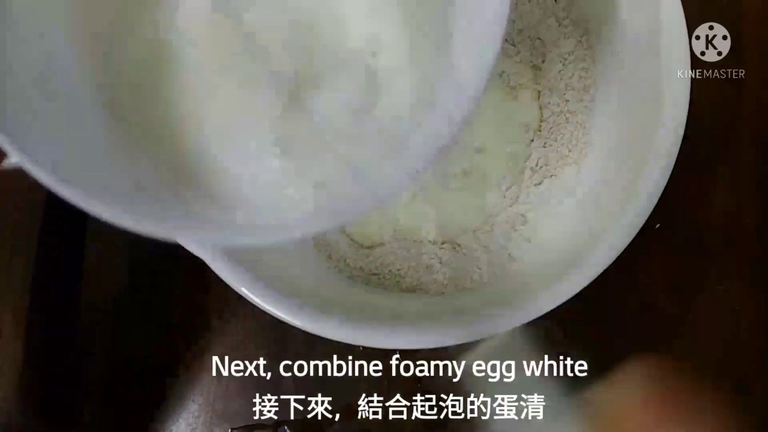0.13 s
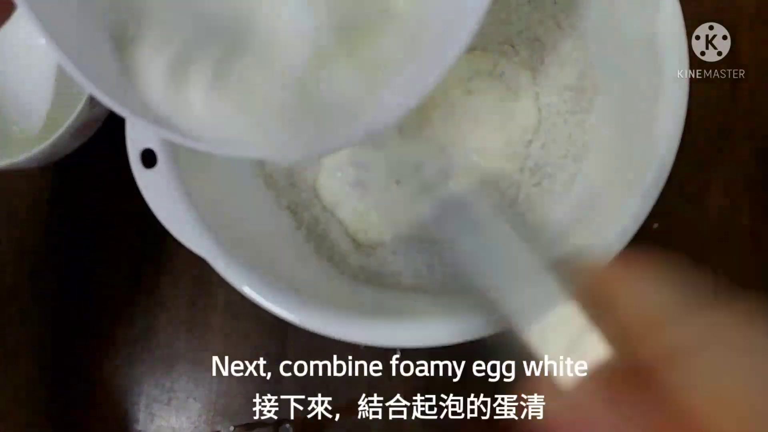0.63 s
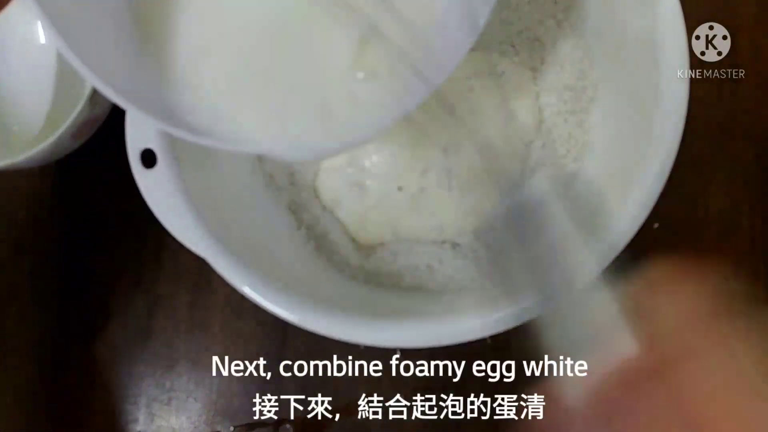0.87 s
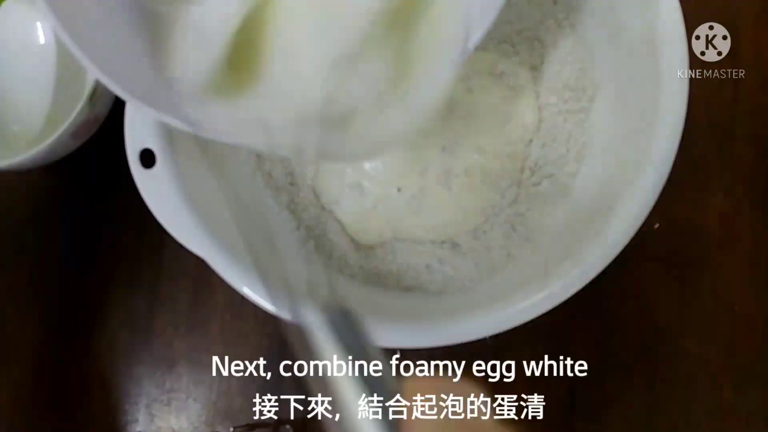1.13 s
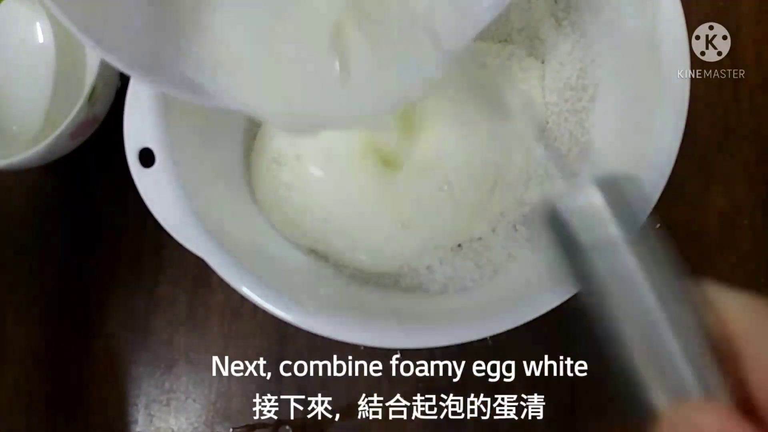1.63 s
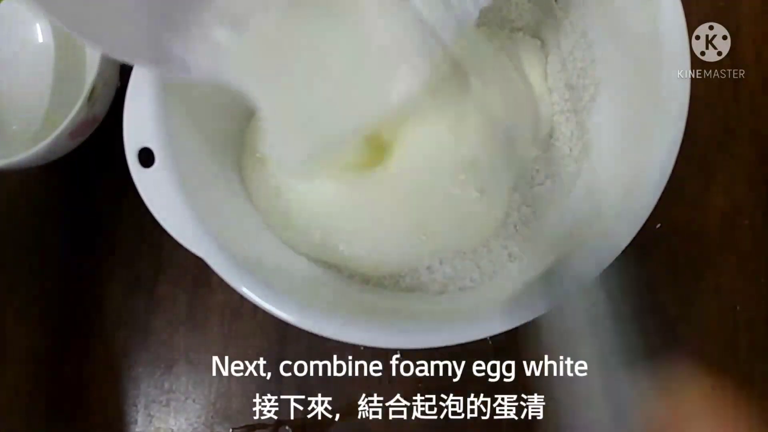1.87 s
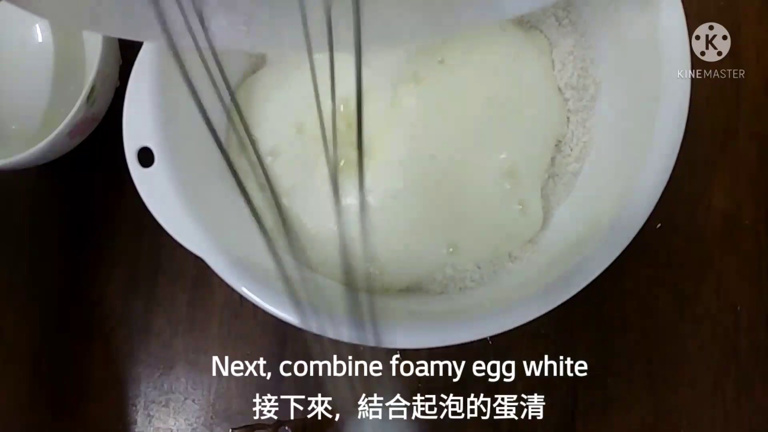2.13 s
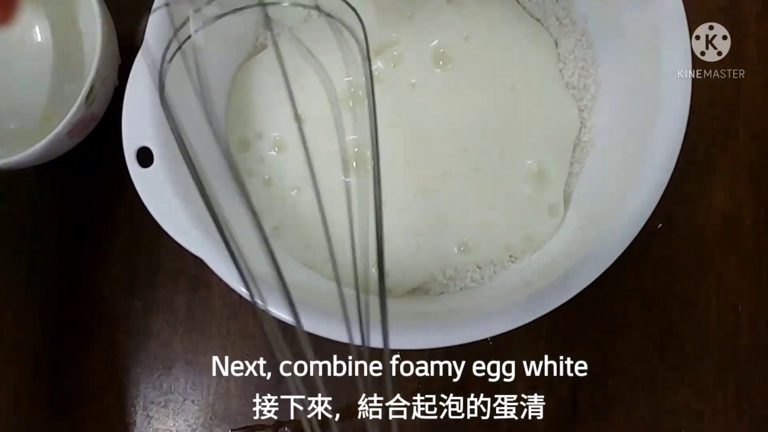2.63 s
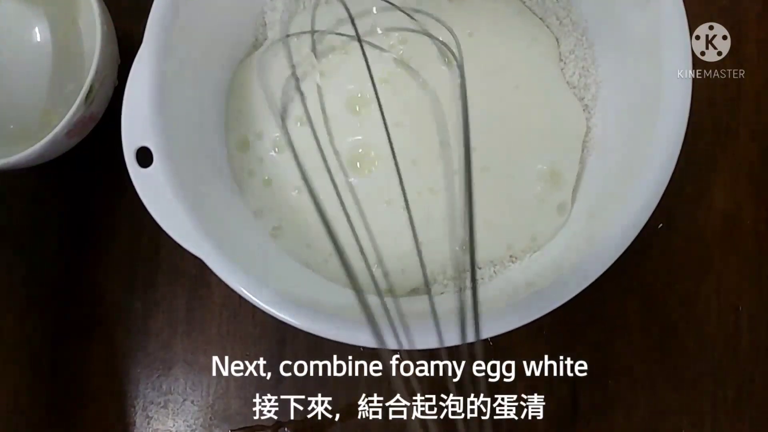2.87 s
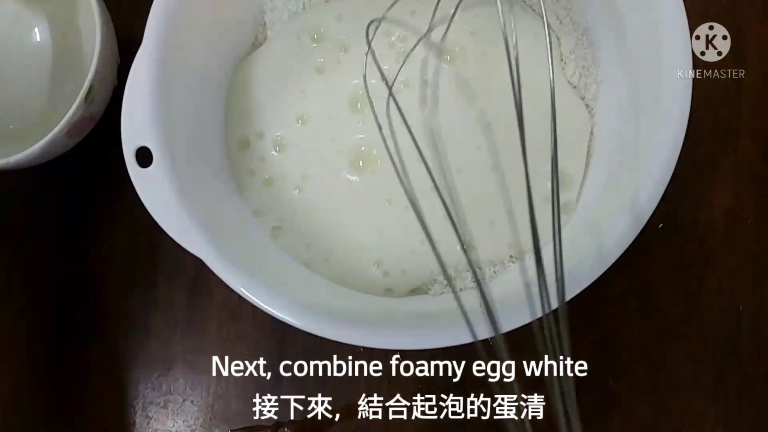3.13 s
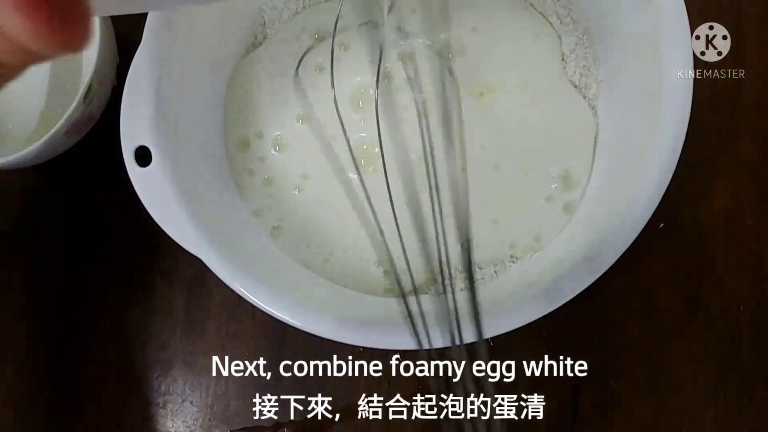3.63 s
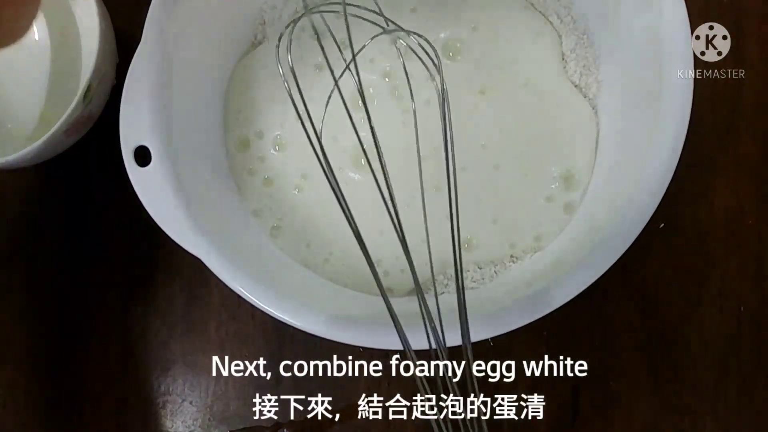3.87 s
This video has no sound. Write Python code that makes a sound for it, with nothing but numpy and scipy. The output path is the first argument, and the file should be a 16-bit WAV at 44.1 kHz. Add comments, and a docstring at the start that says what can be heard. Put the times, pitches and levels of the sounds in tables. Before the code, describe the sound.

Fast metallic whisking clatters against a bowl for over two seconds, then near quiet with faint scraping.

```python
"""A wire whisk rattles round a bowl of foam about five sweeps a second, close to a stereo phone in a small kitchen.
Each sweep the wires land on the wall and chatter: dense tiny ticks that ring the wires and the bowl.
Later the wires slide gently, with the same kind of ticks under slow rasp and singing levels.
A dull double knock and a brighter ping are decaying noise in bands; puffs of air are low noise, mostly on the right.
Filtered hiss, wavering hum lines, faint sine tones and a fading noise drone lie underneath."""
import sys
import numpy as np
from scipy import signal
from scipy.fft import rfft, irfft
from scipy.io import wavfile
from scipy.ndimage import uniform_filter1d

SR = 44100
rng = np.random.default_rng(int(sys.argv[2]) if len(sys.argv) > 2 else 0)


def ratio(d):
    """dB to gain"""
    e = np.asarray(d, float) / 20
    return 10 ** e


def master(y):
    """Save y as 16-bit WAV."""
    cut = np.clip(np.atleast_2d(y).T, -1, 1)
    pcm = np.round(cut * 32767)  # scale
    wavfile.write(sys.argv[1], SR, pcm.astype(np.int16))


N = 176400  # samples, 4 s

# Wires meeting the wall. Each row: landing time in seconds, level in dB before the contact gain,
# left-right difference in dB, bowl drive in dB against the contact, chatter length in seconds.
CONTACTS = [(.002, -12, 2, -31, 0.0094), (0.0208, -1.5, 5, -21.5, 0.018), (0.134, -9.5, 8, -18, 0.0037),
            (0.148, -11, 5, -25, 0.0035), (0.196, -6, 4, -30, 0.0079), (0.208, -5.5, 5, -18.5, 0.01),
            (0.33, -5.5, 7, -11.5, 0.017), (.38, -6.5, 7, -19, 0.011), (0.4, -9.5, 9, -16, 0.0078),
            (0.517, -2, 6.5, -13.5, 0.022), (0.549, -5.5, -2, -38, 0.012), (0.575, -12.5, 6.5, -28, 0.026),
            (0.612, -9.5, 7, -39, 0.0057), (0.705, -5, 7.5, -12, 0.014), (0.732, -12.5, 6, -32, 0.024),
            (0.762, -9.5, 7.5, -20, 0.024), (0.801, -14.5, 2, -34, 0.01), (.8905, -3, 4, -15, 0.016),
            (0.941, -10.5, 4, -21, 0.028), (0.9683, -7.5, 9, -42, 0.0046), (1.082, -0.5, 3.5, -18, 0.027),
            (1.135, -7.5, 4.5, -16.5, 0.02), (1.158, -6.5, 8, -31.5, 0.0046), (1.2819, 0, 2, -14, 0.025),
            (1.3377, -7, 6, -24, 0.01), (1.35, -8.5, 10, -17, 0.013), (1.466, -15, 8.5, -35, 0.011),
            (1.482, -1, 1.5, -17.5, 0.014), (1.52, -8, 9, -14, 0.0068), (1.534, -9, 10, -23, 0.013),
            (1.554, -13, 7, -35, 0.023), (1.651, -17.5, 6.5, -16, 0.042), (1.69, -1.5, 1.5, -17.5, 0.033),
            (1.743, -3, 4, -18, 0.017), (1.8568, -1, 4.5, -17.5, 0.022), (1.9105, -11.5, 6.5, -41, 0.023),
            (1.938, -6.5, 3, -21.5, 0.021), (2.042, -0.5, 5, -25, 0.015), (2.072, -18, 7, -38, 0.014),
            (2.1074, -9, 3, -29, 0.01), (2.1223, -6, 4, -25, 0.016), (2.222, -10.5, 6.5, -19.5, 0.03),
            (2.246, -11, 8.5, -25, 0.019), (2.295, -12.5, 4.5, -30, 0.05), (2.318, -8, 8.5, -17, 0.014),
            (2.421, -2.5, 4, -20.5, 0.028), (2.447, -5, 12, -28, 0.0087), (2.476, -17, 1.5, -37, 0.04),
            (2.513, -11, 6, -22, 0.017), (2.569, -16, 6, -29, 0.017), (2.594, -17.5, 6, -25, 0.019),
            (3.3623, -23, 6, -37, 0.014)]
CONTACT_GAIN_DB = -11
LAND_S, LIFT_S = 0.001, 0.009  # rise time, and time constant of the fall
LAND_DB, LAND_FADE_S = 0.5, 0.0063  # the landing stands out of the chatter

# Slow slide of the wires. Each row: time in seconds, rasp level in dB, singing level in dB.
SLIDE = [(2.47, -78, -50), (2.515, -80, -25), (2.56, -80, -37.5), (2.68, -80, -57), (3.4, -65, -56),
         (3.45, -52, -39), (3.49, -48, -31), (3.52, -44.5, -33), (3.58, -60, -33.5), (3.63, -43, -43.5),
         (3.66, -37.5, -34.5), (3.7, -36, -46), (3.74, -46, -38.5), (3.79, -53, -47), (3.84, -82, -78)]
SLIDE_PAN_DB = 5.5  # left over right

# Tiny impacts, and how unevenly they come.
TICKS_PER_S, TICK_SCATTER_DB = 3500, 3
SHARED_POWER = 0.099  # share of tick power common to both ports
FLUTTER_DB, SLIDE_FLUTTER_DB = 1.5, 4  # depth of the level wander, struck and rubbed
# Colour of the ticks at each port. Each row: frequency in Hz, left in relative dB, right in relative dB.
TICK_COLOUR = [(328, -37, -35), (955, -22, -20), (1550, -19, -23), (2370, -11.5, -11), (3900, -10, -8),
               (5560, -7.5, -6.5), (6020, 2.5, 4.5), (6850, -4, -8.5), (7620, 3.5, 0), (8340, -8.5, 3.5),
               (9040, -12.5, -7.5), (9820, -24, -5), (10200, -42, -57), (11230, -15.5, -13),
               (12600, -18.5, -13.5), (15500, -13, -9), (16100, -45, -46)]
BAND_EDGES_HZ, BAND_WANDER_DB = np.geomspace(1500, 10000, 18), 4

# Ringing of wires and wall. Each row: frequency in Hz, T60 in seconds, struck gain in dB, rubbed gain in dB.
WIRE_RINGS = [(2270, .06, -25, -13), (3380, .05, -29, -21), (4130, .06, -26, -19), (4840, .06, -24, -30),
              (5700, .05, -24, -20), (6020, .05, -18, -24), (6290, .1, -21, -6), (6500, .05, -24, -22),
              (7460, .06, -19, -14), (7630, .06, -20, -18), (7940, .05, -22, -17), (8280, .04, -19, -18)]
RING_WANDER_DB, RING_WANDER_PER_S = 6, 25

# Modes of the bowl. Each row: frequency in Hz, T60 in seconds, gain in dB.
BOWL_MODES = [(890, .035, -15), (975, .055, 0), (1050, .035, -11)]
BOWL_DB, BLOW_DB = 0.5, 21.5  # bowl drive, and the landing blow over its chatter
BOWL_PAN_DB = 4.8  # left over right

# Bands of a dull double knock near one second, one band per row, then one brighter ping.
# Each row: start in seconds, starting level in dB, left-right difference in dB, centre in Hz.
KNOCK_BANDS = [(1.009, -29, -12, 1270), (1.012, -21.5, 15, 714), (1.028, -27.5, -1, 410),
               (1.033, -24, 8, 230), (1.047, -33, 4, 560), (2.511, -26, 10, 2290)]
KNOCK_T60_S, KNOCK_WIDTH = 0.06, 0.16  # width as a share of the centre

# Puffs of air. Each row: centre in seconds, rms level on the right in dB, width in seconds.
PUFFS = [(.04, -29, 0.027), (.155, -23.5, 0.016), (0.769, -32.5, 0.025), (0.883, -22.5, 0.038),
         (1.04, -32.5, 0.055), (1.62, -30, 0.017), (1.769, -23, 0.028), (1.84, -25.5, 0.025),
         (1.98, -24, 0.02), (2.15, -23, 0.019), (3.28, -41, 0.033), (3.95, -35.5, 0.032)]
PUFF_LEFT_DB = -10.5  # left against right
# Colour of the puffs. Each row: frequency in Hz, gain in relative dB.
PUFF_COLOUR = [(25, -58), (45, -14), (75, 17), (110, 11), (160, 6.5), (300, -53)]

# Faint tones. Each row: start in seconds, length in seconds, frequency in Hz, level in dB.
TONES = [(1.9, .2, 650, -50), (2.6, .26, 371, -45.5), (2.93, .28, 371, -46), (3.26, .2, 781, -52),
         (3.78, .2, 905, -55)]

# Low drone. Each row: time in seconds, level in dB.
DRONE = [(0, -44.5), (1.4, -48), (2.4, -61)]
# Band of the drone: lower edge in Hz, upper edge in Hz.
DRONE_BAND_HZ = [240, 335]

# Colour of the room and phone hiss. Each row: frequency in Hz, density in relative dB.
HISS_COLOUR = [(28, -46), (55, -17), (80, -7), (140, -12), (260, -12), (450, -17), (900, -14),
               (2500, -23.5), (4000, -32), (6400, -39), (7800, -27), (9000, -38), (9700, -70), (11000, -57),
               (14800, -52), (15800, -80)]
HISS_DB = -39
# Balance of the hiss. Each row: frequency in Hz, left-right difference in dB.
HISS_PAN = [(100, 9.5), (1000, 4.5), (12000, 3.5)]
# Width of the hiss. Each row: frequency in Hz, side against mid in dB.
HISS_SIDE = [(100, -11), (400, -9.5), (1200, 0), (12000, -1.5)]
# Wavering hum lines. Each row: frequency in Hz, middle level in dB.
HUM = [(80.6, -48), (165, -51), (184, -49), (324, -59), (487, -59), (811, -61), (974, -56)]
WAVER_DB = 3  # depth of the level wander of hum and drone

ROOM_T60_S, ROOM_DB = 0.31, -7.5


def whisk(t):
    """Ticks gated by each contact or slide, heard directly and through the wires and bowl they ring."""
    press, bowl_drive, blows = contacts(t)
    slide = np.array(SLIDE)
    rasp = ratio(np.interp(t, slide[:, 0], slide[:, 1], -120, -120))
    singing = ratio(np.interp(t, slide[:, 0], slide[:, 2], -120, -120))
    flutter = ratio(FLUTTER_DB * walk(150))
    rub_flutter = ratio(SLIDE_FLUTTER_DB * walk(39.84))
    common = ticks()
    thud = bowl(common * bowl_drive + blows)
    ports = []
    for ch, side in ((0, 1), (1, -1)):
        impacts = np.sqrt(SHARED_POWER) * common + np.sqrt(1 - SHARED_POWER) * ticks()
        struck = impacts * flutter * press[ch]
        rubbed = impacts * rub_flutter * ratio(side * SLIDE_PAN_DB / 2)
        scrape = colour(shifting(struck + rubbed * rasp), TICK_COLOUR, 1 + ch)
        ports.append(scrape + thud * ratio(side * BOWL_PAN_DB / 2) + wires(struck, rubbed * singing))
    return np.array(ports)


def contacts(t):
    """Contact pressure per port, bowl drive and landing blows; overlapping contacts add in power."""
    press, bowl_drive, blows = np.zeros((2, N)), np.zeros(N), np.zeros(N)
    for s, db, pan_db, bowl_db, hold in CONTACTS:
        since = t - s + LAND_S  # seconds since first touch
        landing = np.clip(since / LAND_S, 0, 1)
        lifting = np.exp(-np.clip(since - hold, 0, 1) / LIFT_S) * (since < 1)
        accent = ratio(LAND_DB * np.exp(-np.abs(since) / LAND_FADE_S))
        env = landing * lifting * accent
        level_db = db + CONTACT_GAIN_DB
        bowl_level_db = level_db + bowl_db + BOWL_DB
        press += (env * ratio(level_db + pan(pan_db))) ** 2
        bowl_drive += (env * ratio(bowl_level_db)) ** 2
        blows[int(s * SR)] = ratio(bowl_level_db + BLOW_DB)
    return np.sqrt(press), np.sqrt(bowl_drive), blows


def ticks():
    """Dense tiny impacts of random sign and uneven size, rms 1."""
    present = rng.random(N) < TICKS_PER_S / SR
    size = ratio(TICK_SCATTER_DB * rng.exponential(size=N))
    x = present * size * rng.choice([-1., 1.], N)
    return x / np.sqrt(np.mean(x ** 2))


def shifting(x):
    """Bands of the scrape swell and sink independently at random."""
    spectrum = rfft(x)
    band = np.digitize(np.fft.rfftfreq(N, 1 / SR), BAND_EDGES_HZ)
    out = 0
    for k in range(len(BAND_EDGES_HZ) + 1):
        mask = uniform_filter1d(1. * (band == k), size=600)  # soft band edges
        out = out + irfft(spectrum * mask, N) * ratio(BAND_WANDER_DB * walk(RING_WANDER_PER_S))
    return out


def wires(struck, rubbed):
    """Resonances of wires and wall, each driven by the ticks at its own randomly wandering level."""
    out = 0
    for hz, t60, struck_db, rubbed_db in WIRE_RINGS:
        drive = ratio(struck_db) * struck + ratio(rubbed_db) * rubbed
        drive = drive * ratio(RING_WANDER_DB * walk(RING_WANDER_PER_S))
        out = out + signal.oaconvolve(drive, mode(hz, t60))[:N]
    return out


def bowl(drive):
    """The bowl's decaying modes, rung by the chatter and the landing blows."""
    return sum(ratio(db) * signal.oaconvolve(drive, mode(hz, t60))[:N] for hz, t60, db in BOWL_MODES)


def knock_and_ping(t):
    """Decaying noise through a resonant band, for each band of the double knock and for the ping."""
    out = 0
    for s, db, pan_db, hz in KNOCK_BANDS:
        decay = (t >= s) * 1000. ** (-np.clip(t - s, 0, 1) / KNOCK_T60_S)
        b, a = signal.iirpeak(hz, 1 / KNOCK_WIDTH, fs=SR)
        burst = signal.lfilter(b, a, rng.standard_normal(N) * decay)
        makeup = np.sqrt(SR / (np.pi * hz * KNOCK_WIDTH))  # restores level lost to the narrow band
        out = out + burst * makeup * ratio(db + pan(pan_db))
    return out


def puffs(t):
    """Air stirred by the hand buffets mostly the right port: low noise in bell-shaped swells."""
    power = sum(ratio(2 * db) * np.exp(-((t - s) / width) ** 2) for s, db, width in PUFFS)
    env = np.sqrt(power)
    return np.array([colour(rng.standard_normal(N), PUFF_COLOUR) * env * ratio(db)
                     for db in (PUFF_LEFT_DB, 0)])


def tones(t):
    """Soft steady sines far off in the house, with short fades at both ends."""
    out = 0
    for s, length, hz, db in TONES:
        fade = np.clip(np.minimum(t - s, s + length - t) / 0.016, 0, 1)
        out = out + np.sqrt(2) * ratio(db) * fade * np.sin(2 * np.pi * hz * t)
    return out * ratio(pan(5))


def drone(t):
    """Narrow-band noise of wavering level, perhaps far traffic, that fades and then stops."""
    band = signal.butter(2, DRONE_BAND_HZ, "band", fs=SR, output="sos")
    x = signal.sosfilt(band, rng.standard_normal(N))
    level_db = np.interp(t, *np.array(DRONE).T, right=-120) + WAVER_DB * walk(8.38)
    return x / np.std(x) * ratio(level_db + pan(4))


def kitchen(t):
    """Hiss of room and phone from mid and side noise, with wavering appliance hum as sines."""
    hz = np.fft.rfftfreq(N, 1 / SR)
    mid = rfft(colour(rng.standard_normal(N), HISS_COLOUR))
    side = rfft(colour(rng.standard_normal(N), HISS_COLOUR)) * ratio(at(HISS_SIDE, hz))
    hiss = [irfft((mid + k * side) * ratio(k * at(HISS_PAN, hz) / 2), N) for k in (1, -1)]
    hum = 0
    for f, db in HUM:
        level = np.sqrt(2) * ratio(db + WAVER_DB * walk(5.2))
        hum = hum + level * np.sin(2 * np.pi * f * t + 1.55 * walk(4.07))  # phase wanders too
    return np.array(hiss) * ratio(HISS_DB + walk(6.28)) + hum


def room(x):
    """Diffuse reverberation: a decaying noise tail, different at each port."""
    t = np.arange(SR // 2) / SR
    tails = rng.standard_normal((2, len(t))) * 1000. ** (-t / ROOM_T60_S)
    tails = tails * np.clip(t / 0.00043, 0, 1)  # quick onset
    return np.array([signal.fftconvolve(dry_port, tail / np.sqrt(np.sum(tail ** 2)))[:N]
                     for dry_port, tail in zip(x, tails)])


def pan(db):
    """Splits a left-right difference in dB evenly over the two ports."""
    return np.array([[db], [-db]]) / 2


def at(table, hz, col=1):
    """Reads a column of a spectrum on a log-frequency axis."""
    table = np.array(table, float)
    return np.interp(np.log(hz + 1), np.log(table[:, 0]), table[:, col])


def colour(x, table, col=1):
    """Causal minimum-phase filter shaped by the table, rms gain 1 on white noise."""
    size = 8192
    cepstrum = irfft(at(table, np.fft.rfftfreq(size, 1 / SR), col) * np.log(10) / 20)
    # fold the cepstrum onto positive time
    cepstrum[1:size // 2] *= 2
    cepstrum[size // 2 + 1:] = 0
    h = irfft(np.exp(rfft(cepstrum)))
    return signal.fftconvolve(x, h / np.sqrt(np.sum(h ** 2)))[:len(x)]


def mode(hz, t60):
    """One resonance: a decaying sine of unit energy."""
    t = np.arange(SR // 2) / SR
    h = np.sin(2 * np.pi * hz * t) * 1000. ** (-t / t60)
    return h / np.sqrt(np.sum(h ** 2))


def walk(rate):
    """Smooth random wander: levels held 1 / rate s and slewed twice."""
    hold = int(SR / rate)
    steps = np.repeat(rng.standard_normal(N // hold + 1), hold)
    return 1.2 * uniform_filter1d(uniform_filter1d(steps, hold), hold)[:N]


def scene():
    """Whisk, knock and ping in the room, over puffs, tones, drone and kitchen."""
    t = np.arange(N) / SR
    near = whisk(t) + knock_and_ping(t)
    return near + ratio(ROOM_DB) * room(near) + puffs(t) + tones(t) + drone(t) + kitchen(t)


def low_pass(x):
    """Removes everything above the highest recorded frequency."""
    return signal.sosfilt(signal.butter(12, 16810, fs=SR, output="sos"), x)


def record(dry):
    """The phone softly rounds the peaks."""
    soft = 0.8 * np.tanh(dry / 0.8)
    return low_pass(soft)


dry = scene()
out = record(dry)
master(out)
```